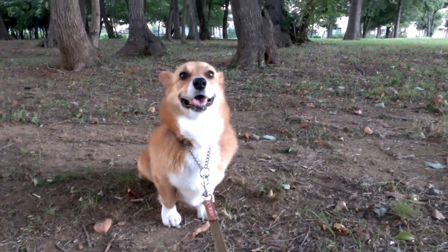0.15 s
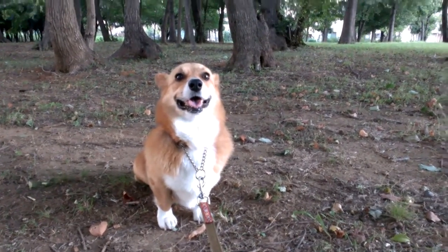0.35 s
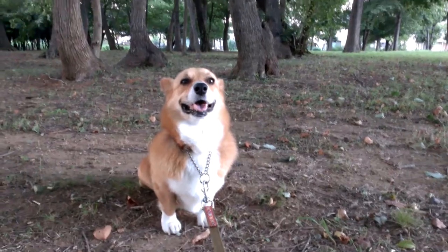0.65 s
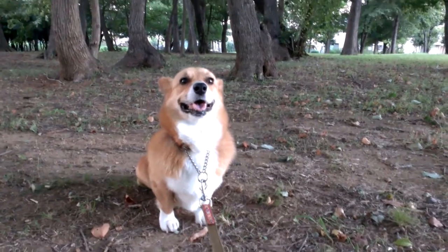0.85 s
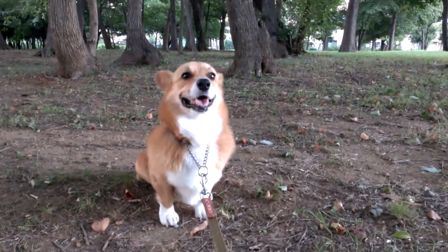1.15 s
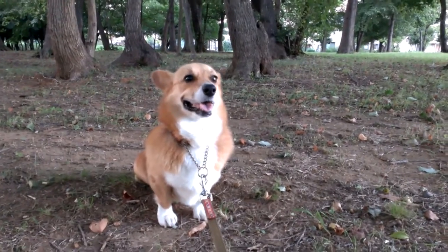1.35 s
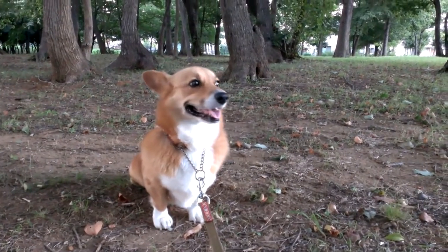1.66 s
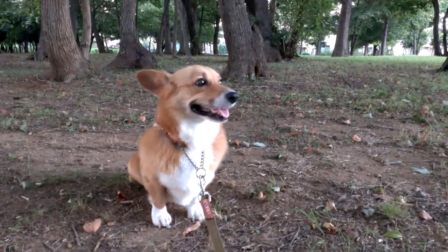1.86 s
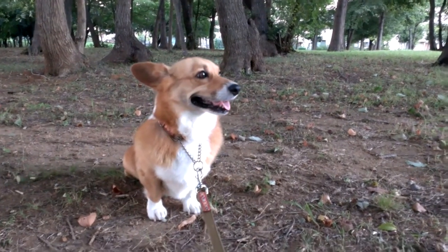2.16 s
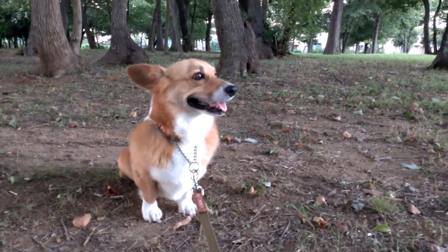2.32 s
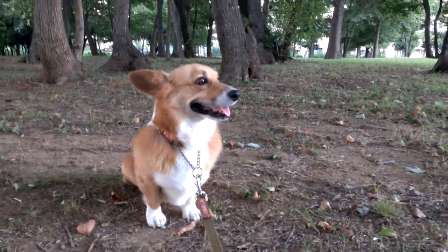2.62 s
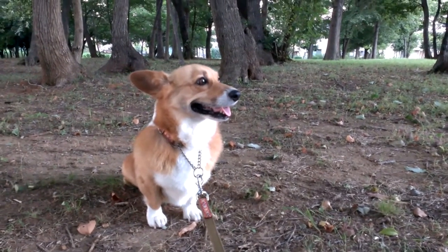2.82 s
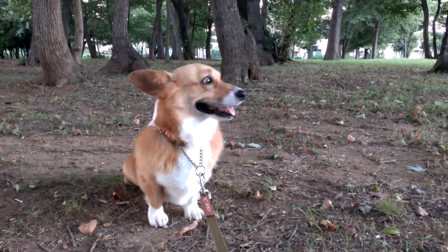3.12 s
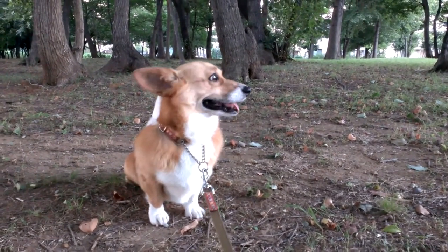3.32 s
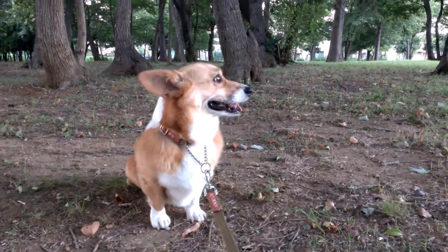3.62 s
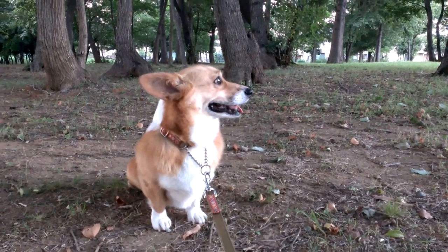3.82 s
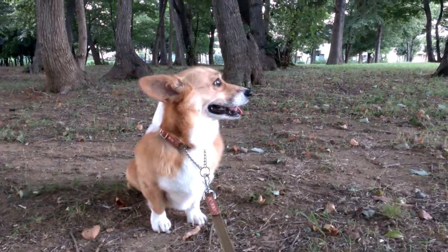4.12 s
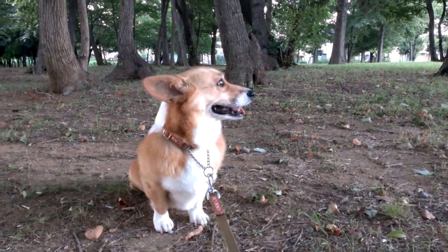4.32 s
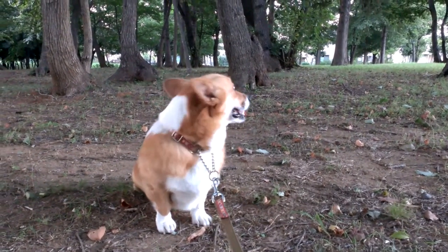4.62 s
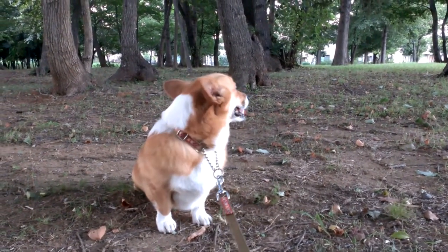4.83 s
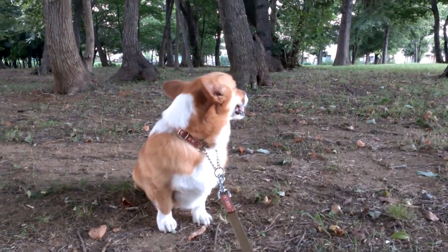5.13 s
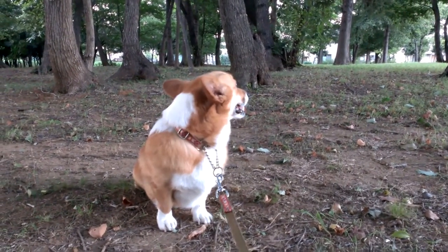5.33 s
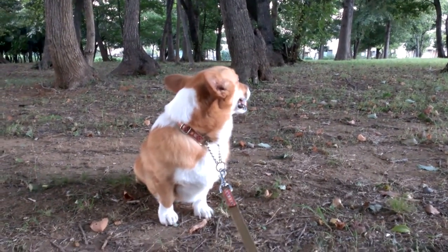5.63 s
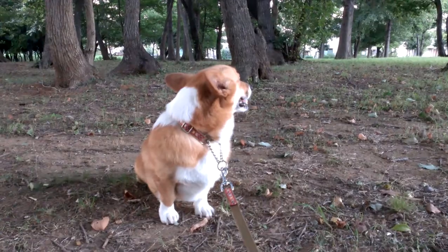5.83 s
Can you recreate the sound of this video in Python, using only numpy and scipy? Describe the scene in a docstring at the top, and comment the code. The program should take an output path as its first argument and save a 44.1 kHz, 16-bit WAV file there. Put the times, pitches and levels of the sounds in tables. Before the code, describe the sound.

Cicadas shrill steadily in a wooded park, one sizzling close on the left, until an evening cicada on the right breaks into a ringing, rapid trill.

```python
"""Cicada chorus in a wooded park

A steady shrill hangs in the trees: noise pulsed by rib clicks, with one sizzling cicada nearer on the left.
Just before halfway an evening cicada on the right starts its ringing trill of about ten syllables a second,
built from tymbal partials with click sidebands and echoed by the trunks as a thin scattered tail.
Under them lie a distant town rumble and soft low thumps on the hand-held microphone, both shaped noise.
Two faint falling sine chirps come from a far bird."""
import sys
import numpy as np
from scipy import signal
from scipy.fft import rfft, irfft
from scipy.io import wavfile

SR = 44100
rng = np.random.default_rng(int(sys.argv[2]) if len(sys.argv) > 2 else 0)


def unload_wav(signal):
    """Save mono or channel-first audio to the path in sys.argv[1] as 16-bit WAV at rate SR, clipped to [-1, 1]."""
    wavfile.write(
        sys.argv[1],
        SR,
        np.round(np.clip(np.atleast_2d(signal).T, -1, 1) * 32767).astype(np.int16),
    )


N = 263277
TIME = np.arange(N) / SR
HZ = np.fft.rfftfreq(N, 1 / SR)

# density of the far chorus: f/Hz, left level/dB per Hz, right level/dB per Hz
CHORUS_DENSITY = [(1500, -102, -102), (2000, -89, -90.5), (2715, -80, -82.5), (3430, -92.5, -87.5),
                  (3850, -83, -75.5), (3852, -82.5, -73), (4726, -70, -57.5), (5220, -64.5, -58),
                  (5735, -65.5, -61), (6600, -67.5, -72), (7000, -70, -77.5), (7500, -72, -97.5),
                  (8730, -82.5, -100), (11600, -100.5, -92.5)]
# swell of the chorus, used relative to its mean: t/s, level/dB
CHORUS_SWELL = [(0, -1), (.4, 0.5), (1.3, -0.34), (2.6, 0.3), (4, 0.5), (5.97, 0)]
# slow drift of the near cicada's effort: t/s, relative level/dB
SIZZLE_EFFORT = [(0, 3), (.45, 2), (.75, -1), (1.1, 3.5), (1.45, -1), (1.75, 3.5), (2.4, -1), (3.1, 2),
                 (3.8, -1), (5, 0), (5.4, -2), (5.9, 4)]
# resonance of the near cicada's body: f/Hz, relative level/dB
SIZZLE_BODY_TONE = [(3500, -38), (5200, -3), (6200, -4.5), (7100, 3), (8100, 6.5), (8900, -2.5),
                    (9800, -10), (10500, -16)]
# moments when the near cicada falters: t/s, depth/dB
SIZZLE_FALTERS = [(.67, 10), (.92, 15), (1.11, 9), (2.4, 5), (2.79, 8), (3.0, 27), (3.18, 14)]
# density of the town beyond the trees: f/Hz, left level/dB per Hz, right level/dB per Hz
TOWN_DENSITY = [(20, -102, -86.5), (50, -98, -90.5), (74.6, -76.5, -81.5), (98, -80, -73),
                (179, -78.5, -80), (314, -84.5, -86), (710, -90, -92.5), (1150, -88.5, -89),
                (1970, -90, -93), (4940, -104, -104)]
# likeness of the rumble at the two microphone ports: f/Hz, correlation/-1 to 1
TOWN_PORT_LIKENESS = [(60, -.25), (130, -0.62), (260, -0.67), (540, -0.39), (1130, 0.0069)]
# low thumps: t/s, length/s, level on the louder side/dB, left minus right/dB
LOW_THUMPS = [(1.125, 0.13, -55.5, -21), (2.342, 0.075, -38.5, -35), (2.415, 0.043, -50, -24),
              (2.448, 0.032, -36.5, -30), (2.615, 0.09, -46, -22), (2.719, .14, -56, -15),
              (3.715, 0.064, -52, -20), (3.832, .1, -49.5, -22), (5.08, .05, -54, 24),
              (5.275, 0.074, -46, 27), (5.603, 0.078, -54, 19)]
# pace of the evening cicada's trill: t/s, rate/syllables per s
TRILL_PACE = [(2.75, 11.531), (3.2, 10.659), (4.3, 10.105), (4.8, 10.249), (5.25, 9.894), (5.85, 10.697)]
# effort of the evening cicada: t/s, level/dB
TRILL_EFFORT = [(2.75, -26.5), (3.03, -17.5), (3.35, -14.5), (3.67, -15.5), (3.84, -13.5), (4.75, -20),
                (4.95, -17.5), (5.92, -21)]
# brightness of its top partials at a syllable's end: t/s, relative level/dB
TOP_BRIGHTNESS = [(2.75, -20), (3.1, -18), (3.45, -8), (3.9, -10.5), (4.25, -8), (4.7, -7.5), (5.1, -3.5),
                  (5.9, 2)]
# partials of its voice: harmonic of the tymbal tone, sideband of the rib clicks,
# left relative level/dB, right relative level/dB
VOICE_PARTIALS = [(1, -1, -31, -41), (1, 0, -20, -14.3), (1, 2, -44, -38), (2, -1, -29, -16.8),
                  (2, 0, -12.5, 0.8), (2, 1, -30, -17), (3, 0, -22.5, -27), (4, -1, -22.5, -37),
                  (4, 0, -16.5, -30.5), (4, 1, -29, -44)]
# faint chirps of a far bird: t/s, length/s, start f/Hz, end f/Hz, relative level/dB
BIRD_CHIRPS = [(3.562, 0.045, 3500, 3360, -52), (4.829, 0.081, 3600, 3000, -58)]

FALTER_S = .03  # half-width of a near cicada's falter, to 1/e of its depth in dB

# the evening cicada warms up to its highest and longest syllables, then tires and settles
TRILL_START_S, WARM_UP_S, TIRE_S = 2.7485, 0.7, 0.9
# pitch of the loud partial: once settled, extra while fresh, lacking while cold
SETTLED_HZ, FRESH_HZ, COLD_HZ = 4332, 76, 190
# length of a syllable, likewise
SETTLED_S, FRESH_S, COLD_S = .031, .008, .023
# no two syllables are quite alike: spread of length (share) and of level
LENGTH_SCATTER, LEVEL_SCATTER_DB = .07, .5
RIB_HZ = 345  # mean rate of its rib clicks

EDGE_HZ = 10600  # upper band edge of the recorder


def amp(db):
    """Decibels to gain."""
    return 10 ** (np.asarray(db) / 20)


def unit(x):
    """Scales to rms 1."""
    return x / np.sqrt(np.mean(x ** 2) + 1e-20)


def curve(s, table):
    """Reads a two-column table at a time, with straight joins."""
    return np.interp(s, *np.transpose(table))


def spectrum(table, axis=1):
    """One column of a table, joined over log frequency."""
    table = np.array(table, float)
    return np.interp(np.log(HZ + 1), np.log(table[:, 0]), table[:, axis])


def colour(white, table):
    """Gives a white pair of signals the left and right densities of a table."""
    density_db = np.array([spectrum(table, axis=1), spectrum(table, axis=2)])
    return irfft(rfft(white) * amp(density_db), N) * np.sqrt(SR / 2)


def wander(rate_hz):
    """Smooth chance of rms 1, up to about the given rate."""
    lowpass = 1 / (1 + (HZ / rate_hz) ** 4)
    return unit(irfft(rfft(rng.standard_normal(N)) * lowpass, N))


def shiver(size, memory):
    """Quick chance of rms 1 that forgets itself within about the given seconds."""
    keep = np.exp(-1 / (SR * memory))
    return unit(signal.lfilter([1], [1, -keep], rng.standard_normal(size)))


def hiss(size, low_hz, high_hz):
    """A band of noise of rms 1."""
    band = signal.butter(3, [low_hz, high_hz], "band", fs=SR, output="sos")
    settled = signal.sosfilt(band, rng.standard_normal(SR // 4))[-size:]
    return unit(settled)


def add(mix, s, sound):
    """Adds a sound to the stereo mix at a time."""
    part = mix[:, max(round(s * SR), 0):][:, :sound.shape[1]]
    part += sound[:, :part.shape[1]]


def tymbal(rate_hz, jitter, ring):
    """An insect's buckling ribs: uneven clicks, each a noise burst decaying by 1/e in a share of the cycle."""
    uneven_hz = rate_hz * (1 + jitter * wander(rate_hz=150))
    turns = np.cumsum(uneven_hz) / SR + rng.random()
    decay = np.exp(-(turns % 1) / ring)
    return unit(decay * rng.standard_normal(N))


def chorus(count=6, flutter_db=0.76):
    """Several far cicadas on each side, their clicks overlapping into a shrill."""
    sides = []
    for side in range(2):
        rates = rng.uniform(180, 480, count)
        crowd = unit(sum(tymbal(rate_hz=rate, jitter=.2, ring=0.51) for rate in rates))
        sides.append(crowd * amp(flutter_db * wander(rate_hz=13)))
    s, db = np.transpose(CHORUS_SWELL)
    swell_db = np.interp(TIME, s, db - np.mean(db))
    return colour(np.array(sides), CHORUS_DENSITY) * amp(swell_db)


def sizzler(left_db=-36.0, right_db=-53, flutter_db=1.96):
    """One near cicada: clicks through its body make a rasp that flutters and at set moments falters."""
    effort_db = curve(TIME, SIZZLE_EFFORT) + flutter_db * wander(rate_hz=17)
    for s, depth_db in SIZZLE_FALTERS:
        effort_db = effort_db - depth_db * np.exp(-((TIME - s) / FALTER_S) ** 2)
    clicks = tymbal(rate_hz=290, jitter=0.55, ring=1.0)
    scattered = rng.standard_normal(N)  # the far port hears it only by way of the leaves
    rasp = irfft(rfft([clicks, scattered]) * amp(spectrum(SIZZLE_BODY_TONE)), N)
    return unit(rasp) * amp(effort_db) * amp([[left_db], [right_db]])


def town(swell_db=1.0):
    """A low, unsteadily heaving rumble of shaped noise, partly opposed at the two ports."""
    a, b = rfft(rng.standard_normal((2, N)))
    same = np.clip(spectrum(TOWN_PORT_LIKENESS), -1, 1)
    right = same * a + np.sqrt(1 - same ** 2) * b
    return colour(irfft([a, right], N), TOWN_DENSITY) * amp(swell_db * wander(rate_hz=21))


def thumps(low_hz=72, high_hz=175):
    """Soft dull bumps of low noise on the microphone, each mostly on one port."""
    out = np.zeros((2, N))
    for s, length, db, pan_db in LOW_THUMPS:
        push = hiss(int(length * SR), low_hz, high_hz)
        bump = unit(push * signal.windows.tukey(len(push), .7))
        sides_db = [[db + min(pan_db, 0)], [db - max(pan_db, 0)]]
        add(out, s, bump * amp(sides_db))
    return out


def trill():
    """Paces the syllables as (s, length s, pitch Hz, level dB, coldness 0-1): they rise, lengthen, then sag."""
    s = TRILL_START_S
    while s < N / SR:
        age = s - TRILL_START_S
        cold = max(1 - age / WARM_UP_S, 0) ** 1.5
        fresh = np.exp(-max(age - WARM_UP_S, 0) / TIRE_S)
        longer, louder = rng.standard_normal(2)
        length = (SETTLED_S + FRESH_S * fresh - COLD_S * cold) * (1 + LENGTH_SCATTER * longer)
        pitch_hz = SETTLED_HZ + FRESH_HZ * fresh - COLD_HZ * cold
        level_db = curve(s, TRILL_EFFORT) + LEVEL_SCATTER_DB * louder
        yield s, length, pitch_hz, level_db, cold
        s += 1 / curve(s, TRILL_PACE)


def syllable(s, length, pitch_hz, level_db, cold, lead=.006, fade=0.0091, arch=0.0011, sag=0.0038,
             build_db=7, dull_db=9, port_phase=3.01, ring_s=.024, ring_share=0.29, top_rise_s=0.0089,
             cold_db=10, top_scatter_db=2.5):
    """A squeeze of the tymbal: a tone with rib-click sidebands, whose loud partial rings on in the abdomen."""
    t = np.arange(-lead, length + .1, 1 / SR)
    n = len(t)
    progress = np.clip(t / length, 0, 1)
    release = np.clip((t - length + fade) / (2 * fade), 0, 1)

    # the loud partial is the second harmonic, so the tymbal tone runs at half the pitch
    bend = arch * (.5 - progress) - sag * release ** 2
    hz = pitch_hz / 2 * (1 + bend + 0.0041 * shiver(n, memory=0.00088))
    tone = np.cumsum(hz) / SR
    ribs = np.cumsum(RIB_HZ * (1 + 0.031 * shiver(n, memory=0.0024))) / SR

    attack = np.clip((t + lead) / lead, 0, 1)
    squeeze = attack * np.cos(np.pi / 2 * release) ** 2 * amp(level_db)

    # the top partials peak early in each syllable
    top = amp(curve(s, TOP_BRIGHTNESS) - dull_db * (progress - 1.0))
    top = top * np.clip((t + lead) / (lead + top_rise_s), 0, 1)
    top = top * amp(top_scatter_db * rng.standard_normal())

    # the hollow abdomen rings up and rings down
    belly = squeeze * amp(build_db * (np.minimum(progress, .65) - 0.75))
    belly = belly * np.clip(t / 0.003 + 0.8, 0, 1)
    keep = np.exp(-1 / (SR * ring_s))
    belly = belly + ring_share * signal.lfilter([1 - keep], [1, -keep], belly)

    buzz = squeeze * amp(-.8 * (level_db + 22))  # the bare buzz varies less than the abdomen's tone
    hum = buzz * amp(-cold_db * cold)  # its pure tone comes only as the insect warms up

    out = np.zeros((2, n))
    for harmonic, sideband, left_db, right_db in VOICE_PARTIALS:
        if harmonic > 2:
            shape, phase = squeeze * top, rng.normal(0, 1.9)
        else:
            # the low partials reach the two ports in nearly opposite phase
            shape, phase = buzz, port_phase
        if (harmonic, sideband) == (2, 0):
            shape = belly
        elif (harmonic, sideband) == (1, 0):
            shape = hum
        turns = harmonic * tone + sideband * ribs + rng.random()
        wave = np.sqrt(2) * np.sin(2 * np.pi * turns + np.array([[phase], [0]]))
        out += amp([[left_db], [right_db]]) * shape * wave

    # uneven rib clicks smear a rasp around the partials
    for left_db, right_db, shape, low_hz, high_hz in [
            (-29, -34, buzz, 1876, 2410),
            (-27, -19, buzz, 3880, 4070),
            (-20, -35, squeeze * np.sqrt(top), 6660, 8600)]:
        rasp = np.array([hiss(n, low_hz, high_hz) for side in range(2)])
        out += amp([[left_db], [right_db]]) * shape * rasp
    return s - lead, out


def grove(x, t60=0.22, first=0.031, count=3):
    """Trunks scatter the call into a thin tail of sparse echoes; the paths shift as the air moves."""
    t, out = np.arange(SR) / SR, np.zeros((2, N))
    for k in range(count):
        hits = rng.standard_normal((2, SR)) * (rng.random((2, SR)) < 1500 / SR)  # about 1500 a second
        taps = hits * amp(-60 * t / t60) * (t > first)
        taps = taps / np.linalg.norm(taps, axis=1, keepdims=True)
        share = np.sqrt(2 / count) * np.cos(np.pi * (1.606 * TIME + k / count))
        out += signal.fftconvolve(x * share, taps, axes=1)[:, :N]
    return out


def evening_cicada(left_echo_db=-7, right_echo_db=-14, scatter_hz=1700):
    """The trill and its echo among the trees, which scatter the high partials best."""
    call = np.zeros((2, N))
    for row in trill():
        add(call, *syllable(*row))
    scattered = signal.lfilter(*signal.butter(1, scatter_hz, "high", fs=SR), call)
    return call + amp([[left_echo_db], [right_echo_db]]) * grove(scattered)


def bird():
    """Thin whistles from deep among the trees: sines gliding down, with a scattered tail."""
    out = np.zeros((2, N))
    for s, length, start_hz, end_hz, db in BIRD_CHIRPS:
        hz = np.linspace(start_hz, end_hz, int(length * SR))
        whistle = np.sin(2 * np.pi * np.cumsum(hz) / SR)
        chirp = amp(db) * np.hanning(len(hz)) * 2 * whistle
        add(out, s, chirp[None])
    return out + .5 * grove(out)


def scene():
    """All the insects and the bird over the low background."""
    return chorus() + sizzler() + town() + thumps() + evening_cicada() + bird()


def record(dry):
    """The recorder's band limit: a steep low-pass."""
    lowpass = signal.firwin(601, EDGE_HZ, window=("kaiser", 9), fs=SR)
    return signal.oaconvolve(dry, lowpass[None], "same")


dry = scene()
out = record(dry)
unload_wav(out)
```